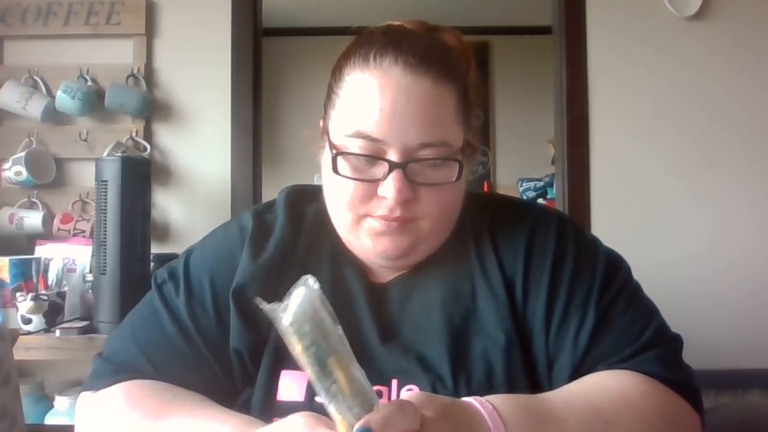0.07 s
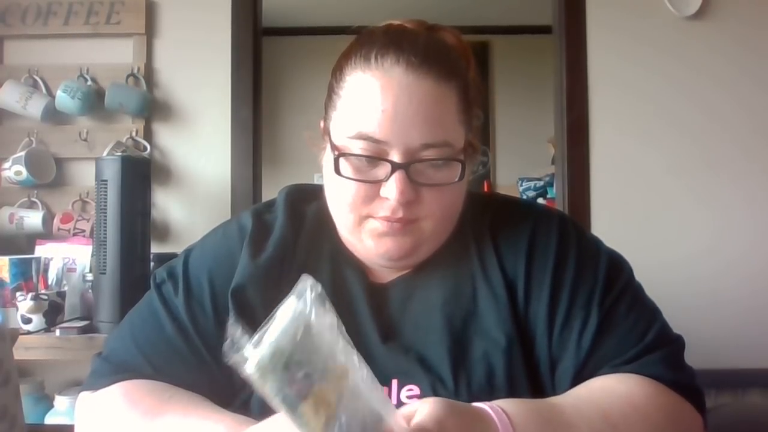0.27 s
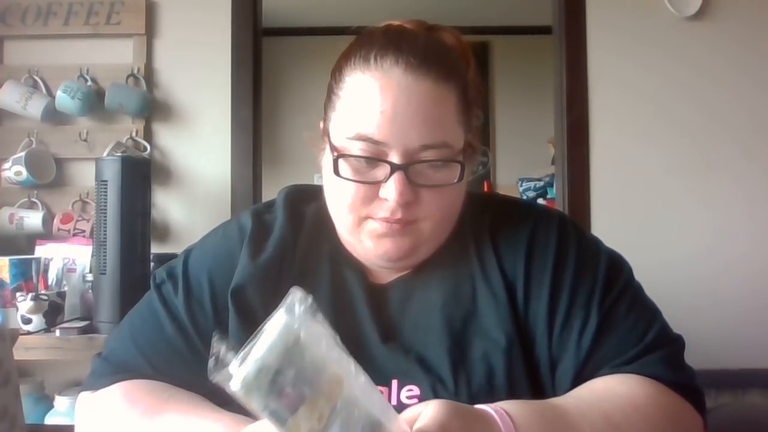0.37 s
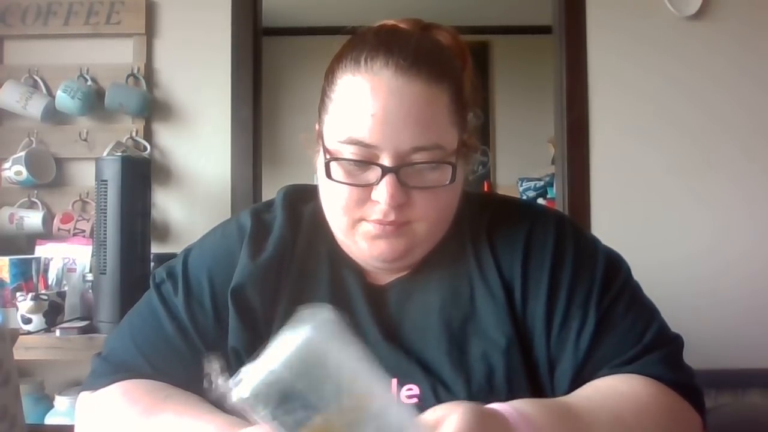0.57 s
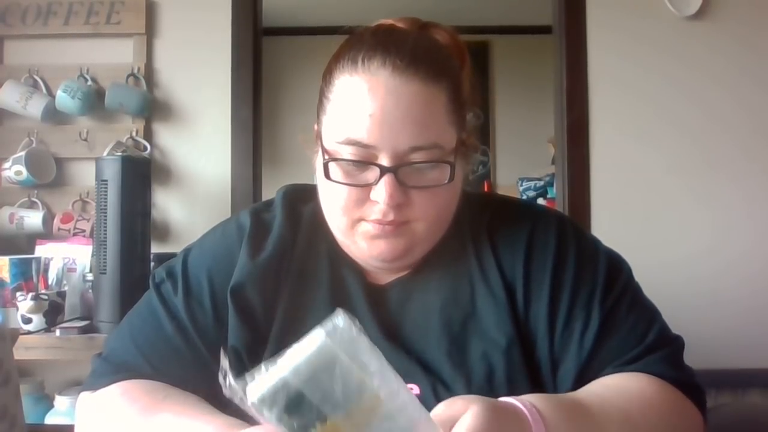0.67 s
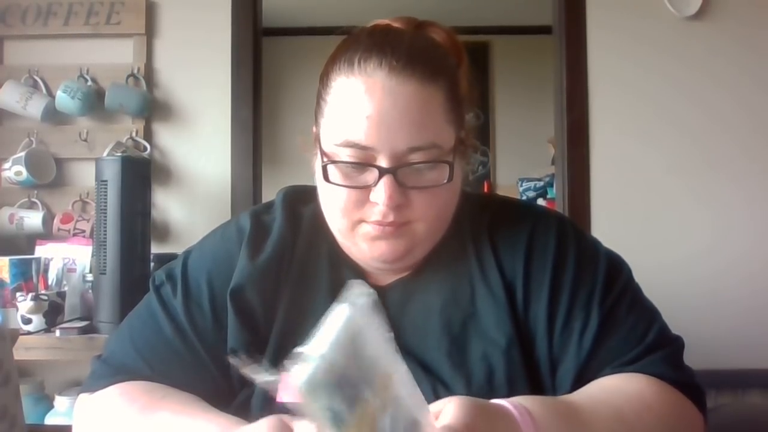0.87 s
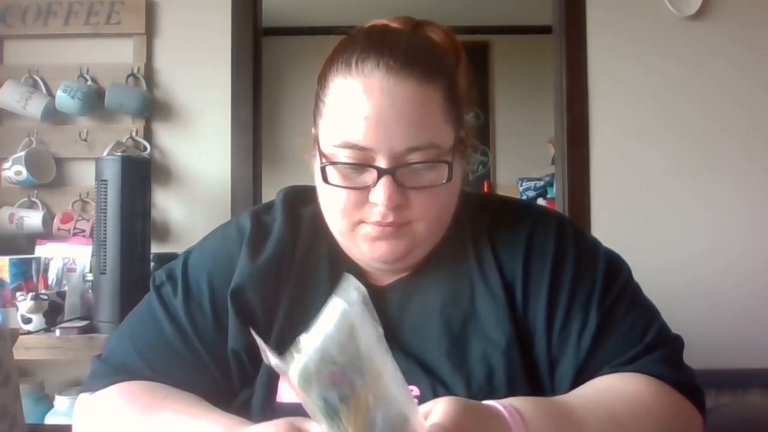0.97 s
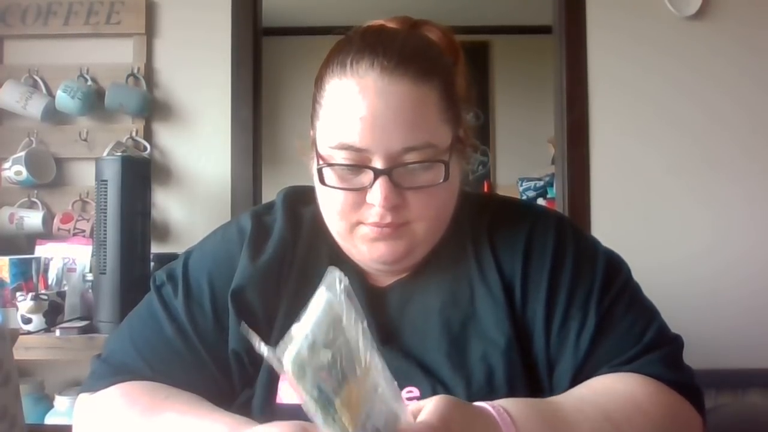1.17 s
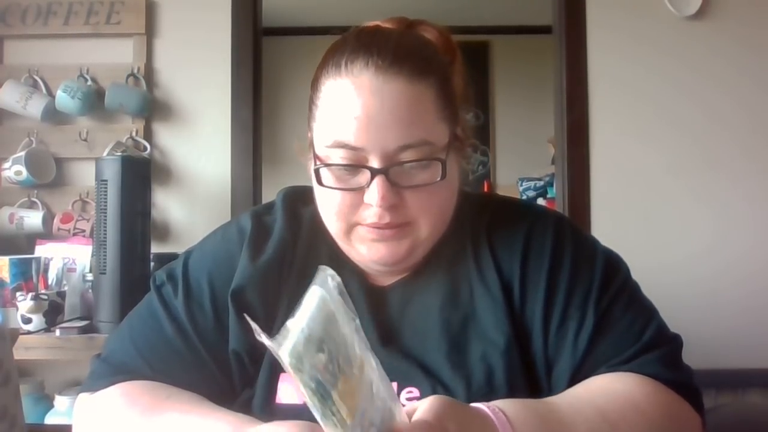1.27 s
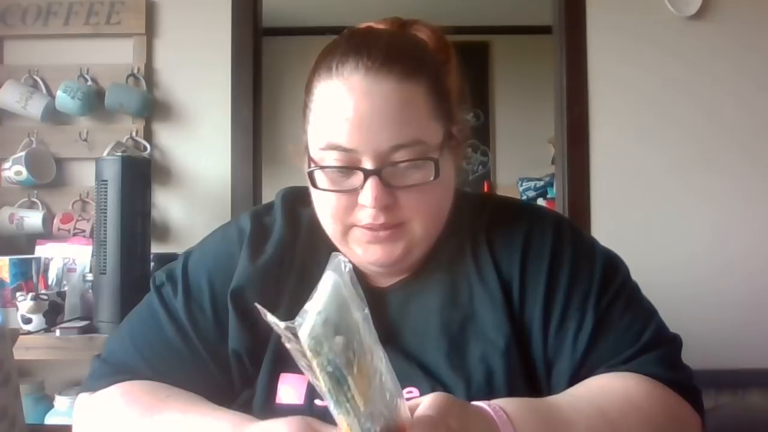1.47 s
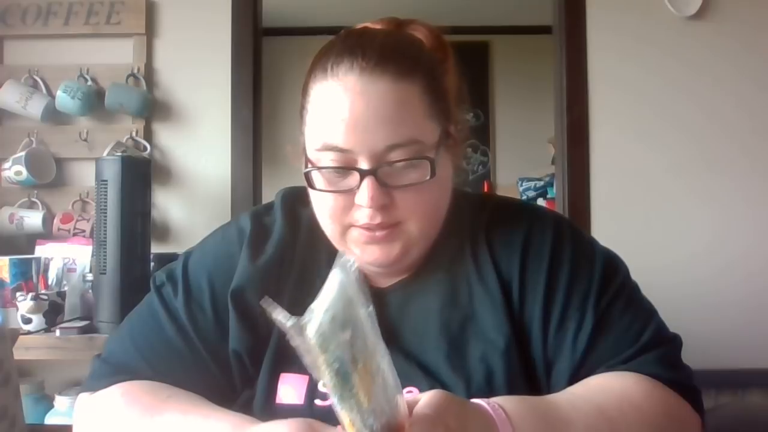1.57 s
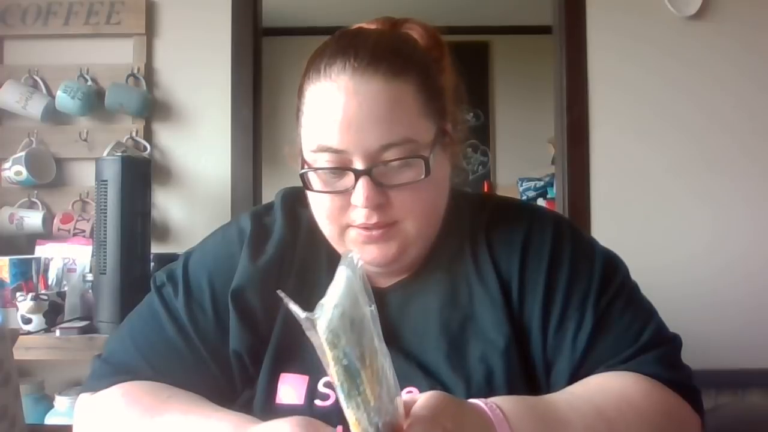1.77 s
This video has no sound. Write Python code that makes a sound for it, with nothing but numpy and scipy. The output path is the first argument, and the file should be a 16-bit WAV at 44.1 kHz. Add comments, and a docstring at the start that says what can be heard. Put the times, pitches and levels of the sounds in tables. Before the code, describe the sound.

Clear plastic packaging crinkles and crackles in the hand, strongest burst about a third through

```python
"""Plastic packet in the hand

A packet in clear plastic film is turned over and squeezed by hand, close to a small microphone in a room.
Creases snap, each a click and a run of slips, over a rustle of countless tiny ones; broad folds pop over.
Snaps, pops and low rumple ring the hollow packet's resonances; a finger slides once with a thin squeak.
The recorder's noise suppressor turns down the pauses, faint hiss included."""
import sys
import numpy as np
from scipy import signal
from scipy.io import wavfile
from scipy.ndimage import uniform_filter1d

SR = 44100
rng = np.random.default_rng(int(sys.argv[2]) if len(sys.argv) > 2 else 0)


def file_out(sig):
    """Save sig as 16-bit WAV at sys.argv[1]."""
    # one column per channel
    cols = np.atleast_2d(sig).T
    # limit, then scale
    lim = np.clip(cols, -1, 1)
    pcm = np.round(lim * 32767).astype(np.int16)
    wavfile.write(sys.argv[1], SR, pcm)


N = 79380
TIME = np.arange(N) / SR

# how hard the film is worked, levels before each layer's trim:
# start_s [s], rustle_db [dB], rumple_db [dB]
FILM_EFFORT = [(0,-43,-43),(.03,-57,-75.5),(.069,-50,-56.5),(.143,-48,-57),(.165,-40.5,-43.5),(.221,-44.5,-50.5),(.3,-41.5,-45),(.362,-35,-47),
               (.413,-44,-48),(.448,-48,-56.5),(.5,-43,-48.5),(.603,-40,-45),(.617,-25.5,-36.5),(.644,-23.5,-30),(.683,-29,-36),
               (.706,-41,-50.5),(.82,-47.5,-49.5),(.882,-41.5,-44.5),(.937,-31.5,-42.5),(.985,-40.5,-48),(1.054,-53,-56),(1.11,-46,-54.5),
               (1.18,-47,-54.5),(1.273,-42,-44.5),(1.33,-46,-48.5),(1.372,-44.5,-51.5),(1.407,-49.5,-85),(1.43,-41.5,-42),
               (1.51,-62.5,-64.5),(1.544,-48.5,-46.5),(1.58,-78,-66.5),(1.62,-69.5,-88),(1.655,-54,-70),(1.66,-45.5,-52),(1.726,-44.5,-51.5),(1.762,-64,-86),(1.79,-48,-54)]

HISS_DB = -70.5
ROOM_DB, ROOM_T60_S, ROOM_DELAY_S = -13, 0.31, 0.0055  # level: whole tail against the direct sound

SLIDE_START_S, SLIDE_END_S = 0.42, 0.56
SLIDE_DB, SLIDE_HZ, SLIDE_WIDTH_HZ = -52, 3450, 320  # width of each of two equal resonances

RUMPLE_DB, RUMPLES_PER_S = -3, 1100
RUSTLE_DB, CREASE_WIDTH_HZ = -0.5, 950
CREASES_PER_S, CREASE_SPREAD_DB = 2200, 2.5  # rate at median effort
DENSITY_FOLLOWS = 0.4  # share of the rustle's level swing that the crease rate follows, in dB

POP_DB, POP_PACKET_DB = -3, -9  # trim of every pop; drive into the packet
POP_RISE_CYCLES, POP_WOBBLE = 0.72, 0.1  # cycles at the starting pitch; rms share of the pitch
POP_SAG_PER_S = 26  # the pitch sinks as the fold relaxes: share per s

SNAP_DB, SNAP_CRACK_DB = 1.29, -15  # trim of every snap; bare slips beside the ringing facet
SNAP_WIDTH_HZ = 2640  # for a facet at 4500 Hz, in proportion for others
AFTERSLIPS_PER_S, AFTERSLIP_DB = 6000, -4.5  # level against the first click
RUN_S, RUN_SPREAD = 0.0014, 0.39  # decay of the run of slips; its log spread from snap to snap
PACKET_DETUNE = 0.086  # log spread of the packet's pitch under the fingers
KNOCK_DB = -13  # how strongly a snap shakes the packet at median rumple or above
KNOCK_FOLLOWS = 0.59  # less where the film hangs slack and the rumple is weak: dB per dB

MIC_LOW_HZ, MIC_HIGH_HZ, CUTOFF_HZ = 103, 6880, 9100
GATE_DB, GATE_SLOPE = -43, 0.72  # threshold; dB of cut per dB below it
GATE_DEPTH_DB, GATE_WINDOW_S = 22, 0.0094


def from_db(db):
    """Decibels to gain."""
    return 10 ** (np.asarray(db) / 20)


def rms_one(x):
    """Scale to an rms of 1."""
    return x / np.sqrt(np.mean(x ** 2) + 1e-20)


def butter(x, hz, kind, order=2):
    """Causal Butterworth filter."""
    sos = signal.butter(order, hz, kind, fs=SR, output="sos")
    return signal.sosfilt(sos, x + 1e-18)


def resonate(x, hz, width_hz):
    """One resonance with a gain of about 1 on top."""
    r = np.exp(-np.pi * width_hz / SR)
    zeros = np.array([1, 0, -1]) * (1 - r * r) / 2
    poles = [1, -2 * r * np.cos(2 * np.pi * hz / SR), r * r]
    return signal.lfilter(zeros, poles, x + 1e-18)


def add(out, s, x):
    """Mix x into out at time s."""
    i = int(np.clip(s * SR, 0, N - 1))
    out[i:i + len(x)] += x[:N - i]


def grains(per_s, spread_db):
    """Random clicks, mostly small and a few large, of even mean power whatever their rate."""
    sizes = from_db(spread_db * np.minimum(rng.exponential(1, N), 4))
    signs = rng.choice([-1, 1], N)
    struck = rng.random(N) < per_s / SR
    return sizes * signs * struck / np.sqrt(per_s)


def evened(x, window_s):
    """Hold the running rms near 1, leaving the fine grain."""
    x = rms_one(x)
    power = np.abs(uniform_filter1d(x * x, int(window_s * SR)))
    return x / np.sqrt(power + .01)


def packet(x, tuning=1):
    """The hollow packet's resonances in parallel, shifted together as the fingers bend it."""
    # resonances of the packet before tuning: pitch_hz [Hz], width_hz [Hz], level_db [dB]
    resonances = [(128,21,-9),(210,105,-9.5),(371.4,103,0.5),(431,70.6,6),(620,75,4.5),(747,61,0),(936,110,-1.5),(1070,86,0),(1540,820,-8)]
    out = 0
    for k, (hz, width_hz, db) in enumerate(resonances):
        out = out + (-1) ** k * from_db(db) * resonate(x, hz * tuning, width_hz)
    return out


def hiss():
    """Faint steady noise, softened toward the treble."""
    return from_db(HISS_DB) * rms_one(butter(rng.standard_normal(N), 2800, "low", order=1))


def room(x):
    """Reflections add a short diffuse tail, noise that decays exponentially after a brief delay."""
    t = TIME[:SR // 2]
    tail = rng.standard_normal(len(t)) * from_db(-60 * t / ROOM_T60_S) * (t > ROOM_DELAY_S)
    tail = from_db(ROOM_DB) * tail / np.sqrt(np.sum(tail ** 2))
    return x + signal.fftconvolve(x, tail)[:N]


def slide():
    """A finger on the film: friction noise in one narrow resonance, swelling and fading."""
    progress = np.clip((TIME - SLIDE_START_S) / (SLIDE_END_S - SLIDE_START_S), 0, 1)
    stroke = np.sqrt(np.abs(np.sin(np.pi * progress)))
    squeak = rng.standard_normal(N)
    for _ in range(2):
        squeak = resonate(squeak, SLIDE_HZ, SLIDE_WIDTH_HZ)
    return from_db(SLIDE_DB) * stroke * rms_one(squeak)


def rumple():
    """Broad folds give way and shake the packet."""
    s, _, db = np.transpose(FILM_EFFORT)
    level_db = np.interp(TIME, s, db) + RUMPLE_DB
    shaken = packet(grains(RUMPLES_PER_S, spread_db=6.5))
    return from_db(level_db) * evened(shaken, window_s=0.079)


def rustle(count=16):
    """Tiny creases, denser and louder with effort, ring facets of many sizes."""
    # colour of the rustle before its level is evened: pitch_hz [Hz], level_db [dB]
    colour = [(900, -4.5), (1700, 1.5), (2900, 3.5), (5200, -5.5), (6500, 7), (7800, -21.5)]
    s, db, _ = np.transpose(FILM_EFFORT)
    level_db = np.interp(TIME, s, db)
    density_db = DENSITY_FOLLOWS * (level_db - np.median(level_db))
    clicks = grains(CREASES_PER_S * from_db(density_db), CREASE_SPREAD_DB)
    facet_of_click = rng.integers(0, count, N)
    colour_hz, colour_db = np.transpose(colour)
    film = np.zeros(N)
    for k, hz in enumerate(np.linspace(1100, 7600, count)):
        facet_db = np.interp(np.log(hz), np.log(colour_hz), colour_db)
        film += from_db(facet_db) * resonate(clicks * (facet_of_click == k), hz, CREASE_WIDTH_HZ)
    return from_db(level_db + RUSTLE_DB) * evened(butter(film, 890, "high"), window_s=0.021)


def pops():
    """A fold flips over with a dull knock, swings unevenly for a few cycles and rings the packet."""
    # broad folds, level before trim and pitch before it sags: start_s [s], level_db [dB], pitch_hz [Hz]
    folds = [(.152,-38.5,480),(.412,-47,435),(.4205,-36.5,300),(.425,-45,180.6),(.537,-37,458),(.616,-22.5,620),(.6385,-22.5,684),(.648,-15.5,1110),
             (.649,-28.5,417),(.66,-32.5,228),(.6935,-21.5,656),(.884,-30,427),(.895,-34.5,291),(.935,-28.5,457),(1.186,-31.5,1010),(1.221,-30.5,670),
             (1.4225,-29.5,546),(1.431,-28,507),(1.4628,-31.5,750),(1.656,-36.5,485),(1.787,-39,455)]
    t, out = TIME[:SR // 20], np.zeros(N)
    for s, db, hz in folds:
        age = t * hz / POP_RISE_CYCLES
        envelope = age * np.exp(1 - age)
        wobble = POP_WOBBLE * rms_one(butter(rng.standard_normal(len(t)), hz, "low"))
        pitch_hz = hz * (1 + wobble) * np.exp(-POP_SAG_PER_S * t)
        swing = envelope * np.sin(2 * np.pi * np.cumsum(pitch_hz) / SR)
        add(out, s, from_db(db + POP_DB) * butter(swing, hz / 2, "high"))
    return out + from_db(POP_PACKET_DB) * packet(out)


def snaps():
    """Each crease gives a click and a dying run of slips that ring its facet and shake the packet."""
    # creases that snap, level before trim: start_s [s], level_db [dB], pitch_hz of the facet [Hz]
    creases = [(.0395,-48,3800),(.0555,-39,5600),(0.0604,-39.5,3500),(0.0749,-39.5,4500),(0.0896,-37,3300),(0.0974,-33.5,5500),(0.1071,-41,4200),
               (0.122,-35.5,4200),(0.1309,-37.5,3850),(0.1532,-37.5,4800),(0.1791,-34,3300),(.1858,-35,5200),(0.2003,-31,4500),(0.205,-35,4600),
               (0.2094,-38.5,5300),(0.2318,-32.5,4700),(0.2378,-33.5,4000),(0.2526,-33.5,3200),(0.2692,-29,5200),(.2761,-35.5,4500),(0.2826,-30.5,4200),
               (.304,-36.5,4000),(0.3099,-27.5,4100),(.3513,-31.5,5400),(0.3665,-33.5,4180),(0.371,-29,5900),(0.377,-36.5,4170),(0.3944,-31.5,5100),
               (0.4076,-39,4660),(0.484,-26,4500),(0.4946,-32,4400),(.5081,-39,4700),(0.5104,-41,3580),(0.5303,-28.5,5500),(0.5356,-37,5140),
               (0.5647,-25.5,4940),(0.5835,-28.5,3100),(0.6104,-23,3480),(0.6184,-20,5030),(0.63,-25,5260),(.632,-26.5,3960),(0.6386,-19,2750),
               (0.6427,-31,4660),(0.6485,-18.5,4220),(.6549,-28,4700),(0.6613,-21,5600),(0.6634,-27.5,2490),(.686,-30.5,4470),(.693,-27.5,3730),
               (0.7686,-36,4250),(0.7915,-41.5,4270),(0.8257,-33.5,3160),(0.8315,-35,3250),(.84,-27,6300),(.8635,-24,4370),(0.868,-34.5,4950),
               (0.8855,-26.5,2940),(0.8961,-24.5,4800),(0.8988,-25.5,5000),(0.9451,-24.5,4770),(.9659,-35,4570),(.9739,-34.5,3300),
               (1.0155,-31,4680),(1.0706,-37,3850),(1.0886,-39.5,5200),(1.1093,-38.5,4140),(1.1222,-37.5,3700),(1.132,-35,4300),(1.1644,-44,4240),
               (1.186,-32,4450),(1.2007,-43.5,4670),(1.216,-32.5,5000),(1.2204,-36.5,4600),(1.248,-32.5,5000),(1.252,-36,4800),(1.267,-36.5,3300),
               (1.273,-34,4870),(1.2872,-38,4000),(1.3007,-40,4300),(1.3133,-37.5,5400),(1.3465,-36.5,5100),(1.3602,-33.5,3730),(1.3669,-34.5,6100),
               (1.4176,-29,4800),(1.4242,-22,6400),(1.4313,-41,3270),(1.527,-40,3540),(1.5353,-42,5700),(1.5504,-44.5,4300),
               (1.62,-41,1770),(1.6203,-42.5,4270),(1.631,-34,5300),(1.6572,-33,2950),(1.6891,-40,3300),(1.712,-42,5000),(1.7158,-35.5,6400),(1.7875,-33,5040)]
    t, out = TIME[:SR // 20], np.zeros(N)
    snap_span = .003 * SR  # level_db is the rms if a snap's energy filled 3 ms
    effort_s, _, rumple_db = np.transpose(FILM_EFFORT)
    for s, db, hz in creases:
        stretch, tuning = np.exp(rng.standard_normal(2) * [RUN_SPREAD, PACKET_DETUNE])
        slipped = rng.random(len(t)) < AFTERSLIPS_PER_S / SR
        sizes = rng.standard_normal(len(t)) * from_db(AFTERSLIP_DB)
        slips = slipped * sizes * np.exp(-t / (RUN_S * stretch))
        slips[0] = 1  # the click itself

        facet = resonate(slips, hz, SNAP_WIDTH_HZ * hz / 4500)
        crack = from_db(SNAP_CRACK_DB) * slips
        slack_db = min(np.interp(s, effort_s, rumple_db) - np.median(rumple_db), 0)
        knock = from_db(KNOCK_DB + KNOCK_FOLLOWS * slack_db) * packet(slips, tuning)
        snap = butter(facet + crack, 1000, "high", order=3) + knock
        add(out, s, from_db(db + SNAP_DB) * snap * np.sqrt(snap_span / np.sum(snap ** 2)))
    return out


def scene():
    """The handled packet in its room, over faint hiss."""
    handling = slide() + rumple() + rustle() + pops() + snaps()
    return (room(handling) + hiss())[None]


def record(dry):
    """A narrow-band microphone, a suppressor that turns quiet moments down, and a steep top cut."""
    x = butter(dry, MIC_LOW_HZ, "high", order=6)
    x = butter(x, MIC_HIGH_HZ, "low", order=9)
    power = np.abs(uniform_filter1d(x * x, int(GATE_WINDOW_S * SR)))
    level_db = 10 * np.log10(power + 1e-14)
    cut_db = np.clip(GATE_SLOPE * (GATE_DB - level_db), 0, GATE_DEPTH_DB)
    top_cut = signal.ellip(10, .2, 80, CUTOFF_HZ, fs=SR, output="sos")
    return signal.sosfilt(top_cut, x * from_db(-cut_db))


dry = scene()
out = record(dry)
file_out(out)
```